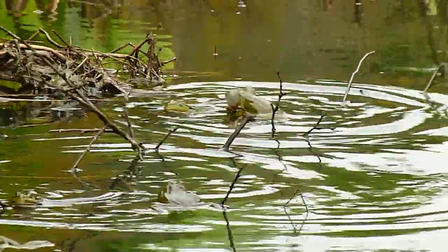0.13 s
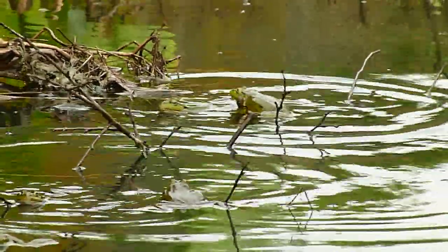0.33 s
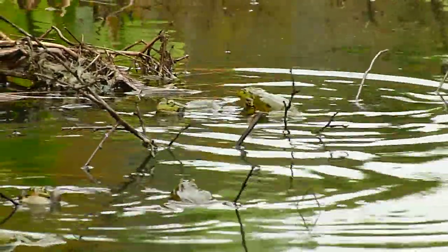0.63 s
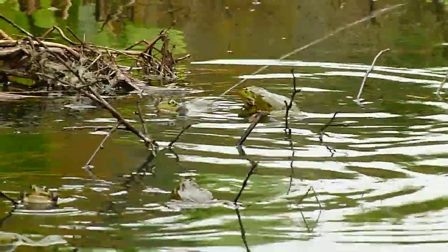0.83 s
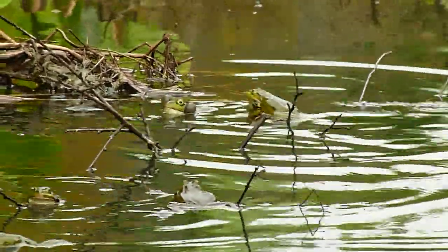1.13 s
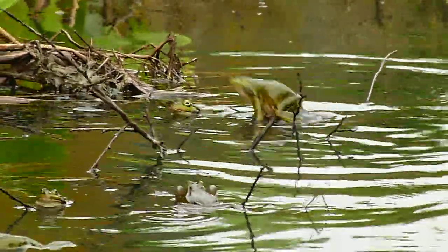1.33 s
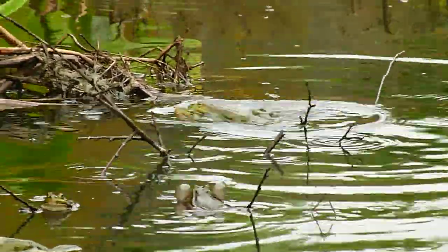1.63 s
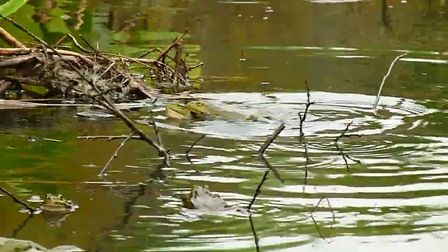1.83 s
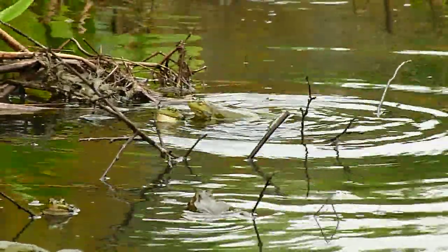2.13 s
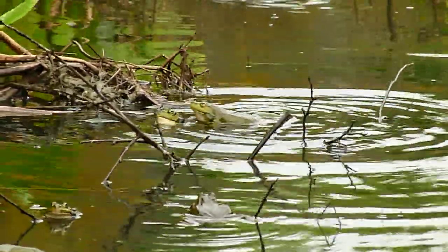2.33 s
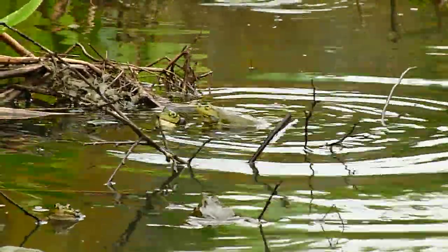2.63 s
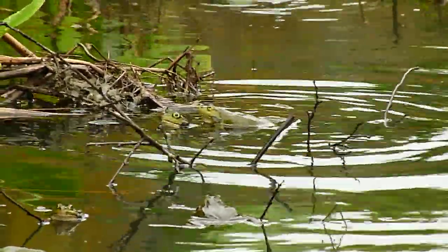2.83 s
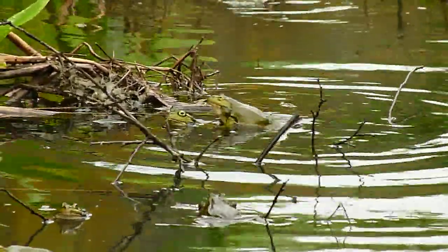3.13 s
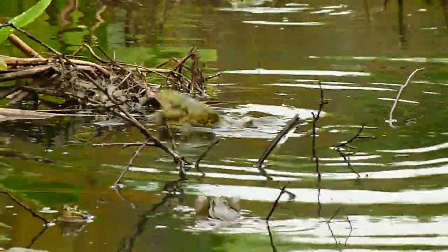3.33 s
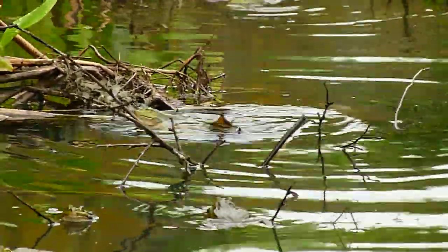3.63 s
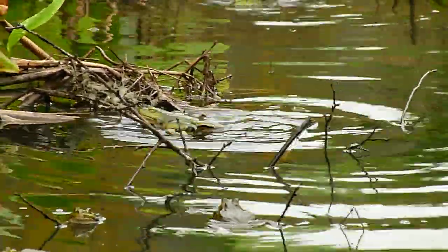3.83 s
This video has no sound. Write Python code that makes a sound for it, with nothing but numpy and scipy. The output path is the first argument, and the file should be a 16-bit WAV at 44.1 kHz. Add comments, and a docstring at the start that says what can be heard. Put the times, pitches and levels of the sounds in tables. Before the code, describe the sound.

Marsh frogs croak at a pond: a close raspy one calls in three quick phrases while duller, deeper and higher frogs answer, over a faint distant chorus and soft breeze; slightly muffled stereo, frogs leaning left.

```python
"""Marsh frogs at a pond, four seconds. A faint distant chorus and a low breeze run all through.
Other frogs croak from the start; the close one joins in three phrases, from about 0.1, 1.4 and 2.6 s.
A croak is a train of larynx pulses ringing a vocal sac: an even swell, then ragged pulses that die away.
A higher rasp comes and goes, deeper frogs and low throat grunts sit behind, and banks echo the croaks.
Near the end the close frog has stopped and the breeze grows; all is dull above 4 kHz and ends near 7.5 kHz."""
import sys
import numpy as np
from scipy import signal
from scipy.fft import rfft, irfft
from scipy.io import wavfile
from scipy.ndimage import uniform_filter1d

SR = 44100
rng = np.random.default_rng(int(sys.argv[2]) if len(sys.argv) > 2 else 0)


def to_linear_factor(level_db):
    """Convert decibel levels (scalar or array-like) to linear amplitude factors."""
    exponent = np.asarray(level_db, float) / 20
    return 10 ** exponent


def int16_out(signal):
    """Quantize to a 16-bit WAV file."""
    q = np.round(np.clip(np.atleast_2d(signal).T, -1, 1) * 32767)
    wavfile.write(sys.argv[1], SR, q.astype(np.int16))


N = 176400

# breeze: (t/s, level/dB)
BREEZE_LEVEL = [(0, -55.5), (0.951, -60.5), (1.151, -55), (2.399, -60.5), (3.399, -57), (3.55, -51.5),
                (4, -50)]
# relative strength of the breeze at each pitch: (f/Hz, level/dB)
BREEZE_COLOUR = [(25, -31), (42, -5.5), (58, 1.5), (76, -10), (110, 2.5), (200, -8), (300, -37)]
# relative strength of the distant chorus and air: (f/Hz, level per Hz/dB)
POND_COLOUR = [(90, -55), (150, -23.5), (330, 2), (470, -8.5), (720, -3.5), (1400, -5.5), (1750, -7.5),
               (2400, -15.5), (4200, -18), (4600, -10), (7400, -22.5)]
# low grunts: (t/s, level/dB)
GRUNTS = [(0.127, -25.5), (0.853, -33), (1.419, -28), (2.742, -30), (2.921, -29.5), (3.116, -28.5),
          (3.305, -31)]
# croaks of slow, steady pulses, short or drawn out: (t/s, level/dB, sac f/Hz, length/s, slowing/share per s)
SLOW_CROAKS = [(0.851, -34, 772, 0.22, 0.98), (1.107, -37, 1380, .17, -.6), (1.48, -25.5, 1560, 0.07, 0.68),
               (3.892, -41, 1130, .15, .3)]
# deeper frogs further off: (t/s, peak level/dB, sac f/Hz)
DEEP_CROAKS = [(0.115, -15, 1150), (0.27, -24, 1065), (0.748, -20.5, 1010), (1.042, -23, 907),
               (1.338, -24.5, 936), (1.869, -31.5, 1060), (2.037, -25, 870), (2.105, -29.5, 936),
               (2.259, -30, 860), (2.723, -21.5, 1090), (3.223, -24, 790), (3.335, -16.5, 1180),
               (3.662, -28.5, 1130)]
# frogs answering between: (t/s, peak level/dB, sac f/Hz)
ANSWER_CROAKS = [(0.0, -5.5, 1323), (0.02, -5, 1490), (0.163, -10, 1715), (0.2101, -4, 1710),
                 (0.3312, -10, 1540), (0.4783, -9, 1704), (0.634, -7.5, 1710), (0.7977, -6, 1765),
                 (0.9943, -14, 1420), (1.4602, -10, 1670), (1.588, -14, 1300), (2.1683, -10, 1760),
                 (2.2245, -14.5, 1600), (2.7294, -7, 1547), (2.8474, -11.5, 1483), (2.9476, -13.5, 1660),
                 (3.0867, -8, 1630), (3.1952, -14.5, 1550), (3.345, -8, 1676), (3.386, -13.5, 1550),
                 (3.5, -11, 1510)]
# frog with a higher rasp: (t/s, level/dB, sac f/Hz, upper resonance level/dB, upper resonance f/Hz)
HIGH_CROAKS = [(0.055,-21,1820,-8,4040),(.61,-22.5,1760,-9,3750),(.735,-24,2000,-5,3900),(.895,-25.5,2080,-3,4160),(1.046,-23.5,1980,-5,3955),(1.19,-22,1890,-7,3850),(1.325,-26,1680,-8.5,3770),(2.32,-24,1850,-24.5,3480),(2.469,-22.5,1830,-23,3200),(3.256,-17,2030,-11,3810),(3.423,-21.5,2010,-6,4010),(3.586,-23,1770,-6.5,3870),(3.728,-25,1654,-9,3880)]
# close frog: (t/s, level/dB, pulse rate f/Hz, sac f/Hz, upper resonance level/dB)
NEAR_CROAKS = [(0.115, -15.5, 291.9, 1584, -13), (0.251, -13.5, 343.8, 1690, -10.5),
               (0.386, -11.5, 377.2, 1780, -12.5), (0.549, -11, 377, 1873, -14.5),
               (0.692, -12, 371.5, 1914, -13.5), (0.835, -15.5, 290.6, 1940, -9.5),
               (0.944, -14, 345, 1660, -16.5), (1.403, -13.5, 330, 1640, -11.5),
               (1.529, -12, 359.8, 1784, -13.5), (1.653, -12, 378, 1946, -9.5),
               (1.787, -13, 392.5, 2000, -8), (1.929, -13.5, 375, 2004, -8),
               (2.058, -14, 354.2, 2020, -10.5), (2.181, -15, 331.2, 1930, -14.5),
               (2.645, -13, 324.7, 1773, -12), (2.769, -13.5, 351.5, 1994, -9.5),
               (2.892, -13, 373, 2010, -8), (3.014, -13.5, 379, 2000, -6), (3.146, -15, 345.9, 2107, -5.5),
               (3.271, -16, 363.5, 1820, -9.5)]
# starts of the close frog's phrases: (t/s)
PHRASE_STARTS = [.1, 1.4, 2.64]
# lesser resonances of each kind of frog, beside its sac: (f/Hz, width/Hz, level/dB)
DEEP_EXTRA = [(547, 170, -14), (2660, 900, -23.5)]
ANSWER_EXTRA = [(1047, 270, -10.5), (2540, 690, -14), (3476, 110, -13)]
HIGH_EXTRA = [(1105, 190, -17.5), (2663, 280, -13.5)]
NEAR_EXTRA = [(330, 51, -36), (860, 485, -18.5), (1300, 324, -11), (2444, 225, -16), (7100, 150, -22.5)]
# treble response of the whole sound: (f/Hz, level/dB)
TREBLE_RESPONSE = [(3900, 0.5), (4500, -10.5), (5200, -11), (7500, -11.5)]

POND_DB, POND_SWELL_DB, POND_FLICKER_DB = -38, 1, 1.2
BANK_T60_S, BANK_DB = 0.22, -5.5  # time for the echoes to fall 60 dB, and their level
LEFT_TREBLE_DB, LEFT_LEAD_S = 5, .00005  # most the two sides differ for a source fully to the left
GRUNT_HZ, GRUNT_WIDTH_HZ, GRUNT_S = 335, 103, 0.019
SLOW_RATE_HZ, DEEP_RATE_HZ, ANSWER_RATE_HZ, HIGH_RATE_HZ = 190, 260, 290, 360  # pulse rates at the start
ANSWER_SAG_PER_S, HIGH_SAG_PER_S = 2.963, 4.5  # pulse gaps grow by this share per s
ANSWER_PEAK_DB, DEEP_PEAK_DB = 12.5, 9  # how far a croak's peak stands above its mean level
RAGGED_RATE_HZ = 260
EVEN_JITTER, SLOW_JITTER, RAGGED_JITTER = 0.024, .055, .14  # unevenness of the gaps, as a share
EVEN_SCATTER_DB, RAGGED_SCATTER_DB = 2, 1.5  # unevenness of pulse strength
SAC_TAIL_SHIFT, OTHER_TAIL_SHIFT = 0.9955, 0.96  # pitch factors in the ragged part
DETUNE = .03  # random mistuning of the lesser resonances, as a share
HISS_DB = -21
NEAR_UPPER_HZ, UPPER_START_HZ, UPPER_SETTLE_S = 3312, 266, 0.31  # settled pitch, extra at a phrase start
TREBLE_PER_UPPER, TREBLE_DB = 1.72, -22  # a treble resonance follows the upper one
TOP_HZ = 7500


def table(points, hz):
    """Value of (Hz, value) points on a log-frequency axis."""
    p = np.array(points, float)
    return np.interp(np.log(np.maximum(hz, 1)), np.log(np.maximum(p[:, 0], 1)), p[:, 1])


def frequencies():
    """Frequencies in Hz of the spectrum of the whole scene."""
    return np.arange(N // 2 + 1) * SR / N


def ring(x, hz, width_hz):
    """Resonance with a sharp attack; a second pass, three times wider, steepens its skirts. Centre gain 1."""
    for w in (width_hz, 3 * width_hz):
        x = signal.lfilter(*signal.iirpeak(hz, hz / w, fs=SR), x)
    return x


def add(out, x, s):
    """Mix x in at s seconds."""
    i = max(int(s * SR), 0)
    out[i:i + len(x)] += x[:N - i]


def walk(rate):
    """Smoothed random steps, rate of them per second, with spread 1."""
    k = int(SR / rate)
    steps = np.repeat(rng.standard_normal(N // k + 1), k)
    curve = uniform_filter1d(uniform_filter1d(steps, k), k)[:N]
    return curve / np.std(curve)


def draws(rows):
    """Chance for the pulses, tuning and air of each croak."""
    return rng.standard_normal((len(rows), 9130))


def breeze():
    """Breeze: noise shaped to a low rumble, alike on both sides."""
    rumble = irfft(to_linear_factor(table(BREEZE_COLOUR, frequencies())) * rfft(rng.standard_normal(N)), N)
    level_db = np.interp(np.arange(N) / SR, *np.array(BREEZE_LEVEL).T)
    return rumble / np.std(rumble) * to_linear_factor(level_db)


def pond():
    """Distant chorus and air: octaves of noise swell together and flicker apart; the bass is nearly mono."""
    out, hz, swell = 0, frequencies(), walk(1.0)
    colour = to_linear_factor(table(POND_COLOUR, hz)) * (hz > 0)
    for lo in 125 * 2 ** np.arange(0, 6, 1.):
        band = colour * (hz >= lo) * (hz < 2 * lo)
        mid, side = (irfft(band * rfft(rng.standard_normal(N)), N) for _ in range(2))
        stereo = mid + min(lo / 4600.0, .6) * side * np.array([[1], [-1]])
        out = out + to_linear_factor(POND_SWELL_DB * swell + POND_FLICKER_DB * walk(11)) * stereo
    return out * to_linear_factor(POND_DB) / np.std(out)


def banks(x):
    """Scattered echoes off reeds and banks: fading noise; only its treble differs left and right."""
    t = np.arange(12000) / SR
    fade = np.exp(-np.log(1000) * t / BANK_T60_S) * (t > .004)
    mid, side = rng.standard_normal((2, len(t))) * fade
    side = signal.sosfilt(signal.butter(2, 1500, "high", fs=SR, output="sos"), side)
    tail = mid + 0.64 * side * np.array([[1], [-1]])
    echoes = signal.fftconvolve(x[None], tail / np.sqrt(np.sum(mid ** 2)), axes=1)[:, :N]
    return to_linear_factor(BANK_DB) * echoes


def place(x, left):
    """A source to the left is earlier and brighter on the left side."""
    hz = frequencies()
    treble = np.minimum(hz / 3300, 1) ** 1.5 * np.clip(7000 / (hz + 1) - .6, 0, 1)
    lead = np.exp(1j * np.pi * hz * LEFT_LEAD_S * left)
    tilt = to_linear_factor(left * LEFT_TREBLE_DB * treble / 2) * lead  # half on one side, its inverse on the other
    return np.array([irfft(rfft(x) * tilt, N), irfft(rfft(x) / tilt, N)])


def grunts():
    """Short low rough throbs of the throats: noise through one resonance, rising then fading."""
    out, t = np.zeros(N), np.arange(6000) / SR
    for (s, db), noise in zip(GRUNTS, rng.standard_normal((len(GRUNTS), len(t)))):
        throb = ring(noise, GRUNT_HZ, GRUNT_WIDTH_HZ)
        add(out, to_linear_factor(db) * throb / np.std(throb) * t / GRUNT_S * np.exp(-t / GRUNT_S), s)
    return out


def croak(chance, db, rate_hz, sac_hz, sac_width_hz, others, swell_s, even_s, sag_per_s, hold_s,
          fall_db_s, stop_s, other_fall_db_s, edge_fall_db_s, jitter=EVEN_JITTER):
    """Even pulses swell, turn ragged, fade and stop; resonances shift a little as the sac empties."""
    timing, strength, detune, air = chance[:60], chance[60:120], chance[120:130], chance[130:]
    since = np.arange(len(timing)) / rate_hz
    ragged = since > even_s
    even_gap = (1 + sag_per_s * since + jitter * timing) / rate_hz
    ragged_gap = np.exp(RAGGED_JITTER * timing) / RAGGED_RATE_HZ
    at = np.cumsum(np.where(ragged, ragged_gap, even_gap)) - 1 / rate_hz
    size = to_linear_factor(np.where(ragged, RAGGED_SCATTER_DB, EVEN_SCATTER_DB) * strength)
    size = size * np.clip(at / swell_s, .06, 1) * np.clip((stop_s - at) / 0.026, 0, 1)
    i = np.clip(at * SR, 0, len(air) - 2)

    def train(strengths):
        """Pulses, each shared between two samples and followed by a puff of turbulent air."""
        pulses = np.zeros(len(air))
        np.add.at(pulses, i.astype(int), strengths * (1 - i % 1))
        np.add.at(pulses, i.astype(int) + 1, strengths * (i % 1))
        puff = signal.lfilter([.1], [1, -.99], pulses)
        return pulses + to_linear_factor(HISS_DB) * air * puff

    def voiced(hz, width_hz, fall, shift):
        """One resonance rung by the even and the ragged pulses."""
        fading = size * to_linear_factor(-fall * np.maximum(at - hold_s, 0))
        even_part = ring(train(fading * ~ragged), hz, width_hz)
        return even_part + ring(train(fading * ragged), hz * shift, width_hz)

    sac = voiced(sac_hz, sac_width_hz, fall_db_s, SAC_TAIL_SHIFT)
    body = sac
    for k, ((hz, width_hz, level_db), u) in enumerate(zip(others, detune)):
        tuned_hz = hz * (1 + DETUNE * u * (k > 0))  # the first one stays in tune
        fall = other_fall_db_s if 2000 < hz < 5000 else edge_fall_db_s
        gain = to_linear_factor(level_db) * np.sqrt(sac_width_hz / width_hz)
        body = body + gain * voiced(tuned_hz, width_hz, fall, OTHER_TAIL_SHIFT)
    return -body * to_linear_factor(db) / np.std(sac[200:1700])  # db is the level of the sac


def slow_frogs():
    """Croaks of slow, steady pulses, short or drawn out."""
    out = np.zeros(N)
    for (s, db, sac, length, sag), c in zip(SLOW_CROAKS, draws(SLOW_CROAKS)):
        add(out, croak(c, db, SLOW_RATE_HZ, sac, 200, DEEP_EXTRA, swell_s=0.038, even_s=length,
                       sag_per_s=sag, hold_s=.012, fall_db_s=5, stop_s=length,
                       other_fall_db_s=15, edge_fall_db_s=15, jitter=SLOW_JITTER), s)
    return out


def deep_frogs():
    """Deeper croaks behind, from lower sac resonances."""
    out = np.zeros(N)
    for (s, peak_db, sac), c in zip(DEEP_CROAKS, draws(DEEP_CROAKS)):
        add(out, croak(c, peak_db - DEEP_PEAK_DB, DEEP_RATE_HZ, sac, 240, DEEP_EXTRA, swell_s=0.014,
                       even_s=.035, sag_per_s=ANSWER_SAG_PER_S, hold_s=.02, fall_db_s=62,
                       stop_s=0.075, other_fall_db_s=67, edge_fall_db_s=89), s)
    return out


def answering_frogs():
    """Duller croaks that swell quickly and answer the others."""
    out = np.zeros(N)
    for (s, peak_db, sac), c in zip(ANSWER_CROAKS, draws(ANSWER_CROAKS)):
        add(out, croak(c, peak_db - ANSWER_PEAK_DB, ANSWER_RATE_HZ, sac, 280, ANSWER_EXTRA,
                       swell_s=0.0058, even_s=.035, sag_per_s=ANSWER_SAG_PER_S, hold_s=0.062,
                       fall_db_s=67, stop_s=0.076, other_fall_db_s=100, edge_fall_db_s=140), s)
    return out


def high_frog():
    """Softer croaks whose rasp, the upper resonance, sits higher."""
    out = np.zeros(N)
    for (s, db, sac, up_db, up_hz), c in zip(HIGH_CROAKS, draws(HIGH_CROAKS)):
        add(out, croak(c, db, HIGH_RATE_HZ, sac, 310, [(up_hz, 340, up_db)] + HIGH_EXTRA, swell_s=.02,
                       even_s=0.045, sag_per_s=HIGH_SAG_PER_S, hold_s=0.034, fall_db_s=390,
                       stop_s=0.071, other_fall_db_s=200, edge_fall_db_s=200), s)
    return out


def near_frog():
    """Loud croaks with a bright upper resonance that outlasts the sac and settles lower in each phrase."""
    out = np.zeros(N)
    for (s, db, rate, sac, up_db), c in zip(NEAR_CROAKS, draws(NEAR_CROAKS)):
        since = s - max(p for p in PHRASE_STARTS if p < s)
        upper = NEAR_UPPER_HZ + UPPER_START_HZ * np.exp(-since / UPPER_SETTLE_S)
        others = [(upper, 170, up_db), (TREBLE_PER_UPPER * upper, 150, TREBLE_DB)] + NEAR_EXTRA
        add(out, croak(c, db, rate, sac, 300, others, swell_s=.014, even_s=.024, sag_per_s=0,
                       hold_s=0.031, fall_db_s=460, stop_s=0.093,
                       other_fall_db_s=98, edge_fall_db_s=520), s)
    return out


def scene():
    """Breeze, pond, all frogs towards the left, and their echoes."""
    others = grunts() + slow_frogs() + deep_frogs() + answering_frogs()
    high, near = high_frog(), near_frog()
    frogs = place(others, .9) + place(high, 1.0) + place(near, 0.8)
    return breeze() + pond() + banks(near + high + others) + frogs


def low_pass(x):
    """Removes everything above the highest recorded frequency."""
    return signal.sosfilt(signal.butter(12, 16000, fs=SR, output="sos"), x)


def record(dry):
    """The sound is dull above about 4 kHz and ends near 7.5 kHz; peaks over full scale are clipped."""
    dull = irfft(rfft(dry) * to_linear_factor(table(TREBLE_RESPONSE, frequencies())), N)
    dull = signal.sosfilt(signal.ellip(8, .3, 70, TOP_HZ, fs=SR, output="sos"), dull)
    mix = np.clip(dull, -1, 1)
    return low_pass(mix)


dry = scene()
out = record(dry)
int16_out(out)
```